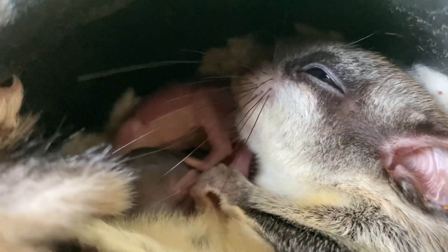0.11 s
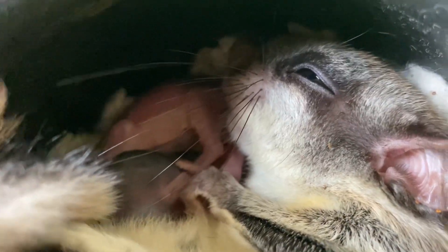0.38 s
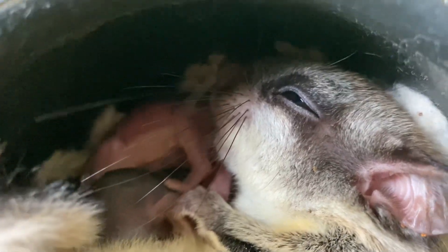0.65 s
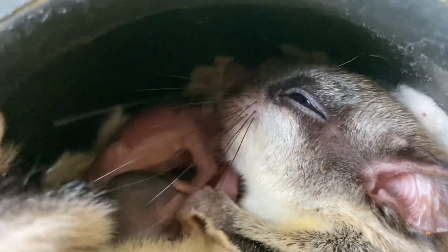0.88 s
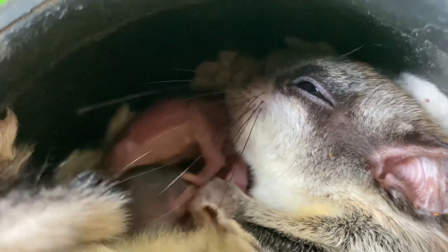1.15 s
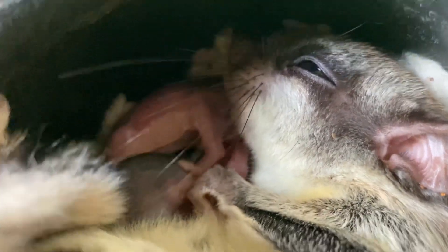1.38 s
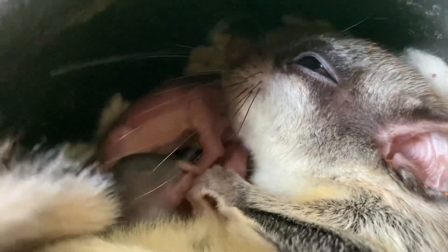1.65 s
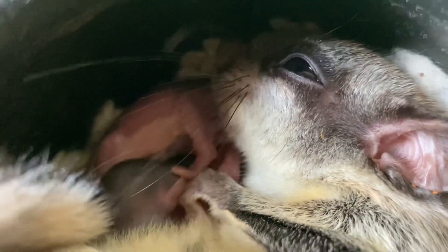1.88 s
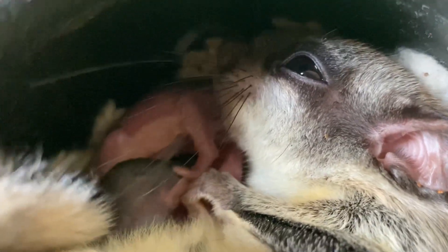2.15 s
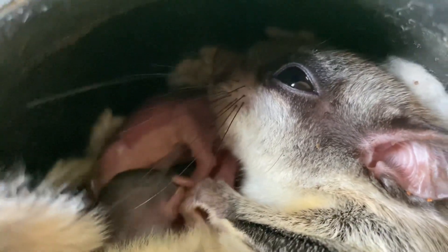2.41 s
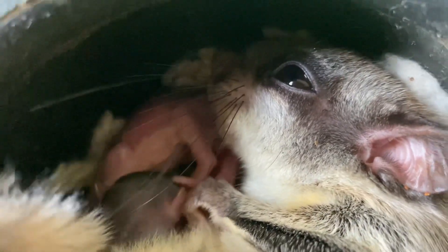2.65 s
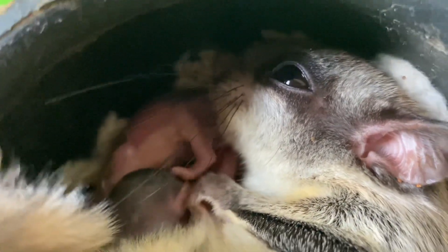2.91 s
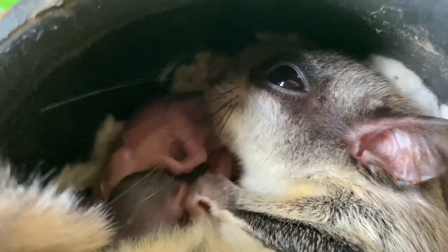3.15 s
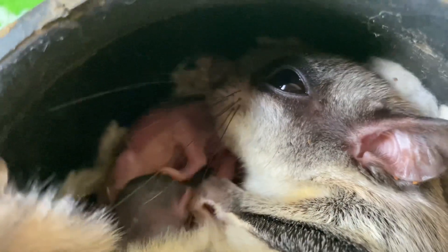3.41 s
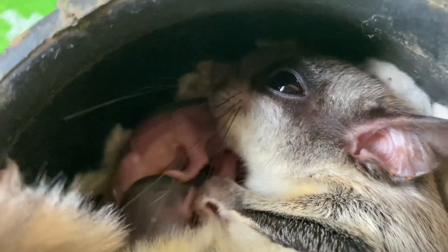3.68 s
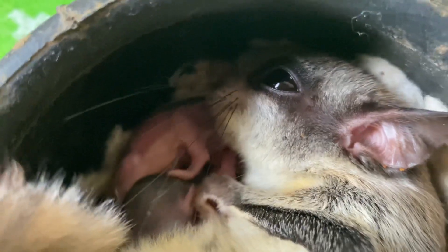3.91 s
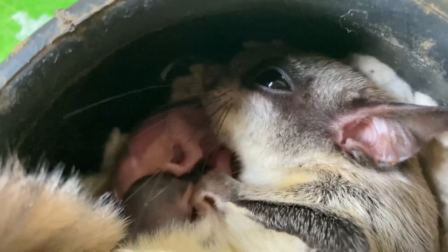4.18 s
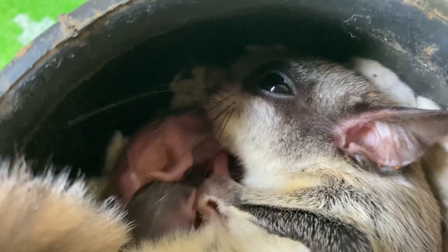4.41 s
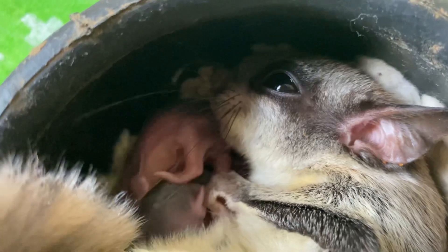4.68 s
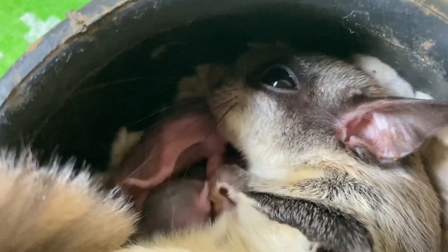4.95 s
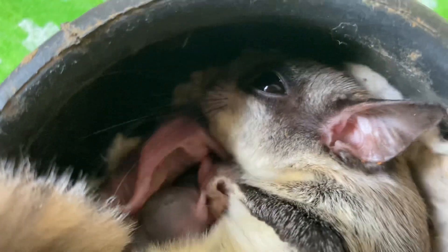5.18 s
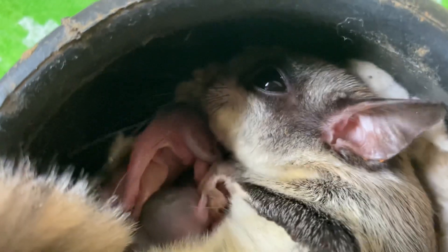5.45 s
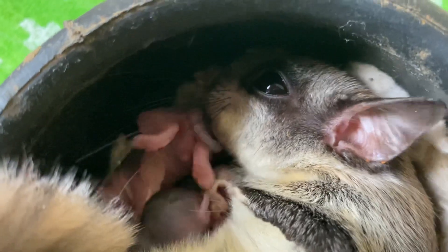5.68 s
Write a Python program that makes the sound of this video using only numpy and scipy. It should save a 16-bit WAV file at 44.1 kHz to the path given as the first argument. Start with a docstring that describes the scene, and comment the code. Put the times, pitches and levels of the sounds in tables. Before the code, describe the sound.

Low wavering engine hum, traffic rumble and light hiss run throughout. Over them, a very small animal pup calls in irregular clusters: brief bending squeaks, upward-leaping whistles, scratchy rasps and dry single clicks. The calls are strongest around three seconds, busy again after four, and sparse after five. The pup is near the microphone in a small hollow; the engine and traffic are far off.

```python
"""A newborn rodent squeaks, rasps and clicks in a hollow nest close to a pair of microphone ports. Its vocal
folds make trains of sharp pressure dips: regular in squeaks, uneven in rasps, single in clicks. The mouth and
the ports colour them, and a short noise tail is the faint ring of the nest. A distant engine drones as three
wavering tones. Behind it, shaped noise makes traffic rumble and hiss."""
import sys
import numpy as np
from scipy import signal
from scipy.fft import rfft, irfft, next_fast_len
from scipy.io import wavfile
from scipy.ndimage import uniform_filter1d

SR = 44100
rng = np.random.default_rng(int(sys.argv[2]) if len(sys.argv) > 2 else 0)


def invert_db(level):
    """Linear amplitude ratio for a level in decibels (20 dB per decade), elementwise."""
    return 10 ** (np.asarray(level, dtype=float) / 20)


def pcm_store(signal):
    """Save signal as 16-bit PCM."""
    levels = np.round(np.clip(np.atleast_2d(signal), -1, 1) * 32767)
    wavfile.write(sys.argv[1], SR, levels.astype(np.int16).T)


N = 256662  # length in samples

# Clear squeaks whose pitch bends smoothly. Each row: start in seconds, length in seconds,
# level in dB before the mouth, start, middle and end pitch in Hz, extra overtone slope in dB per octave;
# in some rows also: pitch drop at the very end (0-1), fade in dB, weakening of every other pulse (0-1).
BENDING_SQUEAKS = [(0.876, 0.05, -43.5, 1200, 1170, 980, -7, 0, 0), (0.936, 0.049, -45, 1080, 999, 900, -7),
                   (1.081, 0.0087, -45, 990, 1065, 1120, -6), (1.264, 0.043, -46.5, 1516, 1532, 1375, -2.5),
                   (1.355, 0.021, -46, 1494, 1570, 1620, -1), (1.7385, .007, -46, 1450, 1520, 1560, -1.5),
                   (2.407, 0.047, -43, 1940, 1885, 2130, -0.5),
                   (2.657, 0.027, -37, 1437, 1472, 1455, 0, .1),
                   (2.712, .023, -39, 1290, 1400, 1490, 0, 0, 0, .75),
                   (2.768, .014, -46, 2250, 2260, 2240, -2), (2.95, 0.029, -36, 1335, 1353, 1114, 2),
                   (3.2205, .011, -36, 1640, 1680, 1720, 3, 0, 0, .9),
                   (3.229, .016, -38, 1740, 1740, 1560, 3.5),
                   (3.243, .0065, -38, 1600, 1610, 1600, 3, 0, 0, .9),
                   (3.668, .037, -44.5, 1900, 1900, 2119, -0.5),
                   (3.866, 0.0072, -45, 2060, 2140, 2300, -0.5),
                   (3.945, 0.018, -45, 950, 956, 945, 4, 0, 0),
                   (4.028, .012, -48, 1850, 1850, 1800, -1, 0, -6),
                   (4.265, .027, -39, 1250, 1520, 1540, 1, .25),
                   (4.312, 0.032, -38, 1340, 1630, 1450, 1, .25),
                   (4.372, .019, -42, 1400, 1540, 1650, 0, 0, -1), (4.6, .014, -40.5, 810, 825, 790, 1.5),
                   (4.707, 0.022, -46.5, 2285, 2140, 2050, 0.5),
                   (4.92, 0.025, -47, 1900, 2050, 1900, -3, .2),
                   (4.982, .0115, -46, 1600, 1780, 1700, -3, .4)]
# Squeaks that leap up and hold a whistle. Each row: start in seconds, climb in seconds, hold in seconds,
# level in dB before the mouth, low, high and end pitch in Hz;
# in some rows also: pitch drop at the very end (0-1), fade in dB.
LEAPING_SQUEAKS = [(1.6045, 0.027, .011, -36, 1160, 1400, 1380, .15),
                   (1.7175, .008, .011, -40, 1130, 1360, 1430),
                   (1.977, 0.0077, 0.033, -40, 1150, 1517, 1680, .35),
                   (2.1205, .0105, .034, -41, 1280, 1570, 2120, 0, -10),
                   (2.354, .022, 0.021, -37.5, 1248, 1870, 2110),
                   (2.733, .0155, .021, -37, 1490, 2330, 2300, 0, -1),
                   (2.993, .016, 0.026, -37.5, 1300, 2096, 1910),
                   (3.283, 0.0075, .038, -42.5, 1400, 1990, 2290),
                   (4.636, .036, 0.0032, -41, 1175, 1480, 1590)]
# Stretches where the folds beat unevenly. Each row: start in seconds, end in seconds, pitch in Hz,
# level in dB before the mouth; in some rows also: roughness (0-1), weakening of every other pulse (0-1).
RASPS = [(0.921, 0.986, 1047, -49, .8), (1.587, 1.606, 1141, -39, .9), (2.347, 2.356, 1208, -37.5),
         (2.398, 2.414, 1897, -39.5), (2.648, 2.66, 1400, -39.5, .6, .7),
         (2.682, 2.697, 1400, -39.5, .8, .7), (2.699, 2.714, 1300, -40.5, .8, .7),
         (2.724, 2.736, 1450, -45), (2.934, 2.969, 1385, -43), (2.979, 2.994, 1200, -33.5),
         (3.218, 3.223, 853, -41), (3.249, 3.26, 1403, -45), (3.267, 3.284, 1360, -43),
         (3.918, 3.948, 1620, -41, .6, .75), (3.96, 4.009, 1600, -40, .55, .75),
         (4.009, 4.016, 1354, -43, .7), (4.017, 4.027, 1250, -43, .5), (4.212, 4.227, 1400, -39.5, .55, .6),
         (4.236, 4.256, 1313, -46.5), (4.256, 4.266, 1150, -42), (4.292, 4.314, 1386, -43),
         (4.388, 4.397, 1400, -45), (4.591, 4.604, 1506, -43.5), (4.614, 4.642, 1249, -40),
         (4.945, 4.956, 1620, -50, .5)]
# Single snaps of the folds. Each row: time in seconds, level in dB before the mouth, pitch in Hz.
CLICKS = [(1.01, -45, 980), (1.03, -43, 950), (1.053, -47, 1130), (1.643, -46, 1050), (1.65, -45, 1450),
          (1.688, -42, 950), (1.694, -44, 982), (1.698, -43, 1030), (1.703, -45, 950), (1.707, -41, 1160),
          (1.712, -41, 1390), (1.93, -49, 1140), (1.937, -43, 1090), (2.07, -41, 1170), (2.113, -42, 950),
          (2.116, -41, 1390), (2.319, -51, 1440), (3.055, -49, 1560), (3.074, -46, 1150),
          (3.077, -47, 1490), (3.261, -42, 1440), (3.529, -49, 1200), (3.534, -49, 1450),
          (3.546, -45, 1430), (3.556, -46, 1100), (3.564, -44, 1410), (3.57, -45, 1530), (3.577, -45, 1530),
          (3.605, -49, 1430), (3.635, -46, 1390), (3.666, -45, 1500), (3.897, -51, 1400),
          (3.906, -50, 1450), (3.914, -45, 1400), (3.917, -44, 1530), (4.205, -45, 1270),
          (4.208, -44, 1370), (4.227, -45, 1270), (4.231, -44, 1490), (4.346, -48, 1430),
          (5.049, -50, 1370), (5.072, -49, 1200), (5.076, -46, 1430), (5.08, -43, 1380), (5.094, -46, 977),
          (5.3, -49, 1320), (5.311, -46, 1370), (5.34, -45, 1090), (5.591, -49, 1080), (5.616, -44, 1110),
          (5.639, -44, 1140), (5.655, -46, 1450), (5.799, -48, 991), (1.579, -45, 1080),
          (1.7365, -43, 1100), (2.035, -46, 1250), (2.04, -46, 1150), (2.6265, -47, 1400),
          (3.212, -46, 1000), (3.492, -49, 2100), (3.5095, -50, 2000), (3.5935, -49, 1400),
          (3.597, -48, 1450), (4.9085, -49, 2100)]
# Colour given to all the calls by the small mouth and the ports, with a peak near 2.5 kHz. Each row: frequency
# in Hz, gain in dB.
CALL_COLOUR = [(600, -3), (1000, 3), (1900, 2.5), (2500, 3.5), (3100, 1), (4600, -2.5), (7000, -9), (10000, -17),
               (12000, -21), (14500, -22)]
# The nearby voice at the two ports. Each row: frequency in Hz, left over right in dB,
# lead of the left port in radians.
PORTS = [(90, 0, 0.26), (300, 30.5, 0.5), (810, 8.5, 1.7), (1200, 6.5, 2.1), (1532, 3, 2), (1900, 3.5, 4),
         (2590, -2.2, 7), (3300, 2, 7.5), (4300, 10.5, 7), (5330, 6.5, 4.5), (6720, -3.5, 6.5),
         (8900, 0, 3.1), (9860, -2.5, 1), (10700, 6, 0.6), (13000, 0, -3.1), (14400, 5, -6)]
# The engine and the traffic. Each row: time in seconds, firings a second, level of the third, fourth
# and fifth order in dB, relative lift of the traffic rumble in dB.
ENGINE = [(0, 18.8, -55, -41, -51, -1), (1.898, 21.5, -54.5, -46, -54.5, -1),
          (2.4, 20.5, -55.5, -48.5, -49.5, -1), (3.097, 25.8, -50.5, -50.5, -50, -1),
          (3.599, 23.2, -45, -45.5, -54, -2), (4.202, 23.3, -37.5, -52.5, -48.5, 1),
          (4.902, 24.4, -48.5, -37, -44, 1.5), (5.82, 21.2, -47, -48.5, -50, 2.5)]
# Steady surroundings. Each row: frequency in Hz, relative level per Hz in the left port in dB,
# unshared part in the right port in dB (0 or more means all of it), left over right in dB.
AIR = [(29.3, -97.5, -26, 0), (54.4, -60.5, -11.5, -0.5), (94, -60.5, -17, -0.5),
       (152.6, -65.5, -13.5, -1.5), (218.7, -77, -2, -1.5), (605, -90, -2.7, 2), (1500, -101, 4, -9.5),
       (1777, -98, 1.5, 0.5), (2550, -86, -2.6, -0.5), (3990, -97.5, -1.5, 1.5), (4210, -92, -0.8, 4),
       (5880, -99, 1, -0.5), (6250, -108, -3.5, 0), (7300, -106, -3, 2), (8900, -116, -21, 0),
       (10500, -126, -10, 0), (16000, -136, 13.5, -9)]

AIR_DB = -42.5  # overall level of the surroundings
WOBBLE = 0.011  # unsteadiness of a squeak's pitch, rms share
LEAP_SLOW_S = 0.012  # the climb gathers speed over about this long
RISE_DB, RISE_S = -2.5, 0.009  # soft start of a squeak and how fast it passes
FADE_DB, FALL_SHARE = -2.5, 0.74  # usual fade, over this last share of a squeak
SHARP_DB = -7.5  # overtone slope at 1500 Hz, dB per octave
HIGH_CALL_DB_PER_OCT, CLIMB_DB_PER_OCT = -1, -7.5  # its change with pitch: between calls, within a call
DROP_S = 0.0025  # the folds slacken this fast as a squeak stops
HALVING, ROUGH = 0.4, 0.9  # usual weakening of every other pulse in a rasp; usual roughness
SNAP_DELAY_S = 0.001  # added to the listed time of a click to place its dip


def read(points, hz):
    """Reads all columns of a table over frequency, on a logarithmic scale."""
    f, *columns = np.transpose(points)
    return [np.interp(np.log(hz + 1), np.log(f + 1), c) for c in columns]


def evened(x):
    """Scales to rms 1."""
    return x / np.sqrt(np.mean(x ** 2) + 1e-20)


def add(mix, s, sound):
    """Lays a sound into the mix at a time in seconds."""
    part = mix[round(s * SR):][:len(sound)]
    part += sound[:len(part)]


def folds(hz, slope_db, jitter, skip, weak, halving=0):
    """Sharp pressure dips; a cycle may be early, late or weak, and each lets out a puff of air."""
    luck = rng.random((len(hz) // 10 + 10, 3))  # one row of chance for each cycle
    cycle = (np.cumsum(hz) / SR).astype(int)
    uneven_hz = hz * (1 + jitter * (2 * luck[cycle, 0] - 1))
    turns = np.cumsum(uneven_hz) / SR + 0.5
    strength = np.where(luck[:, 1] < skip, weak, 1) * (1 - skip * luck[:, 2])
    strength[::2] *= 1 - halving
    strength = strength[(turns + 0.5).astype(int)]
    wave = np.full(len(hz), 0.6)  # mean flow: uneven pulses leave a low body under the pitch
    for k in range(2, 12):
        below_limit = k * hz < SR / 2
        wave += invert_db(slope_db * np.log2(k)) * below_limit * np.cos(2 * np.pi * k * turns)
    breath = uniform_filter1d(rng.standard_normal(len(hz)), size=2)
    puffs = breath * np.cos(np.pi * turns) ** 2
    wave += invert_db(slope_db - 14 + 18 * skip) * puffs
    # the fundamental rings on longer through a weak pulse than the overtones do
    core = np.cos(2 * np.pi * turns) * uniform_filter1d(strength, size=19)
    return -np.sqrt(2) * (core + wave * uniform_filter1d(strength, size=9))


def squeak(start, hz, level_db, drop, fade_db=FADE_DB, sharp_db=0, halving=0):
    """Nearly regular cycles: a clean gliding whistle, purer the higher it climbs."""
    t = np.arange(len(hz)) / SR
    wobble = evened(uniform_filter1d(rng.standard_normal(len(hz)), size=150))
    hz = hz * (1 + WOBBLE * wobble)
    hz = hz * (1 - drop * np.exp((t - t[-1]) / DROP_S))
    tail = np.clip((t / t[-1] - 1) / FALL_SHARE + 1, 0, 1)
    effort_db = RISE_DB * np.exp(-t / RISE_S) + fade_db * tail ** 2
    slope_db = SHARP_DB + sharp_db + HIGH_CALL_DB_PER_OCT * np.log2(hz.mean() / 1500)
    slope_db = slope_db + CLIMB_DB_PER_OCT * np.log2(hz / hz.mean())
    slope_db = slope_db + 0.45 * effort_db  # softer parts are also duller
    edge = np.clip(np.minimum(t, t[-1] - t) / 0.0014, 0, 1)
    wave = folds(hz, slope_db, jitter=0.03, skip=0.12, weak=0.6, halving=halving)
    return start, invert_db(level_db + effort_db) * edge * wave


def bend(start, length, level_db, start_hz, middle_hz, end_hz, sharp_db,
         drop=0, fade_db=FADE_DB, halving=0):
    """A squeak whose pitch follows a parabola through start, middle and end."""
    u = np.linspace(0, 1, round(length * SR))
    line = start_hz + (end_hz - start_hz) * u
    bow = (4 * middle_hz - 2 * start_hz - 2 * end_hz) * u * (1 - u)
    return squeak(start, line + bow, level_db, drop, fade_db, sharp_db, halving)


def leap(start, climb, hold, level_db, low_hz, high_hz, end_hz, drop=0, fade_db=FADE_DB):
    """A squeak whose pitch climbs ever faster, then drifts."""
    t = np.arange(-climb, hold, 1 / SR)
    floor = np.exp(-climb / LEAP_SLOW_S)
    up = (np.exp(np.minimum(t, 0) / LEAP_SLOW_S) - floor) / (1 - floor)
    drift = np.maximum(t, 0) / hold
    hz = low_hz + (high_hz - low_hz) * up + (end_hz - high_hz) * drift
    hz = uniform_filter1d(hz, size=150, mode="nearest")  # rounds the corner
    return squeak(start, hz, level_db, drop, fade_db)


def rasp(start, end, hz, level_db, rough=ROUGH, halving=HALVING):
    """Irregular cycles: strong and weak pulses at random."""
    n = round((end - start) * SR)
    wave = folds(np.full(n, float(hz)), slope_db=-6.5, jitter=0.27 * rough, skip=0.5 * rough,
                 weak=0.35, halving=halving)
    return start, invert_db(level_db) * evened(wave) * signal.windows.tukey(n, 0.3)


def click(s, level_db, hz):
    """One dip of the folds with a small swing before it and a short ring after."""
    t = np.arange(-round(2.5 * SR / hz), round(5 * SR / hz)) * hz / SR  # in cycles from the dip
    wave = folds(np.full(len(t), float(hz)), slope_db=-12.0, jitter=0, skip=0, weak=1)
    shape = np.where(t < 0, np.exp(-(t / 1.24) ** 2), np.exp(-t / 0.6))
    return s + SNAP_DELAY_S + t[0] / hz, invert_db(level_db) * evened(wave * shape)


def pup():
    """All calls through the small mouth, with the nest's faint ring, reach two ports unequally."""
    voice = np.zeros(N)
    for calls, make in ((BENDING_SQUEAKS, bend), (LEAPING_SQUEAKS, leap), (RASPS, rasp), (CLICKS, click)):
        for row in calls:
            add(voice, *make(*row))
    no_bass = signal.butter(2, 600, "high", fs=SR, output="sos")  # a tiny mouth sends out little bass
    voice = signal.sosfilt(no_bass, voice)
    size = next_fast_len(2 * N)
    hz = np.fft.rfftfreq(size, 1 / SR)
    colour_db = read(CALL_COLOUR, hz)[0]
    voice = irfft(rfft(voice, size) * invert_db(colour_db), size)[:N]
    t = np.arange(SR // 10) / SR
    # the ring starts after 1 ms and falls by 60 dB in 0.07 s
    nest = rng.standard_normal((2, len(t))) * invert_db(-60 * t / 0.07) * (t > 0.001)
    nest = nest / np.linalg.norm(nest[0])
    ring = invert_db(-21) * signal.oaconvolve(voice[None], nest, axes=1)[:, :N]
    balance_db, lead = read(PORTS, hz)
    right = irfft(rfft(voice, size) * invert_db(-balance_db) * np.exp(-1j * lead), size)[:N]
    return np.array([voice, right]) + ring


def engine():
    """Low firing orders, each wavering in strength and phase on the long way here."""
    s, rate, *orders_db, _ = np.transpose(ENGINE)
    t = np.arange(N) / SR
    turns = np.cumsum(np.interp(t, s, rate)) / SR
    drone = np.zeros(N)
    for order, db in enumerate(orders_db, 3):
        noises = rng.standard_normal((2, N))
        a, b = (evened(uniform_filter1d(uniform_filter1d(v, 5000), 5000)) for v in noises)
        tone = np.exp(2j * np.pi * (order * turns + rng.random()))
        wavering = (1 + 0.39 * (a + 1j * b)) * tone
        drone += invert_db(np.interp(t, s, db)) * evened(wavering.real)
    return drone


def air():
    """Random short-time spectra: traffic rumble below, a patchy hiss above, a slow swell."""
    frames, hz = N // 512 + 5, np.fft.rfftfreq(2048, 1 / SR)
    a, b, c, d, patches = rng.standard_normal((frames, 1025, 5)).T
    patches = evened(uniform_filter1d(uniform_filter1d(patches, 20, 0), 8, 1))
    t = np.arange(frames) * 512 / SR
    # slow waves from 0.15 to 3 a second, the slowest strongest
    waves = [np.sin(2 * np.pi * (f * t + rng.random())) / np.sqrt(f) for f in np.geomspace(0.15, 3, 20)]
    swell = evened(sum(waves))
    level_db, unshared_db, balance_db = (v[:, None] for v in read(AIR, hz))
    unshared = invert_db(np.minimum(unshared_db, 0))
    lead = read(PORTS, hz)[1][:, None]
    s, *_, rumble_db = np.transpose(ENGINE)
    lift_db = np.interp(t, s, rumble_db) / (1 + (hz[:, None] / 350) ** 2)  # mostly the low end
    lift_db -= 0.6 * t * np.exp(-np.log((hz[:, None] + 1) / 4000) ** 2)  # the hiss slowly recedes
    left = a + 1j * b
    shared = np.sqrt(1 - unshared ** 2) * left * np.exp(-1j * lead)
    right = (shared + unshared * (c + 1j * d)) * invert_db(-balance_db)
    spectra = np.array([left, right]) * invert_db(level_db + lift_db + 1.35 * patches + 0.097 * swell)
    noise = signal.istft(spectra, nperseg=2048, noverlap=1536)[1][:, :N]
    return invert_db(AIR_DB) * evened(noise)


def scene():
    """The pup over engine and air."""
    return pup() + engine() + air()


def band_limit(x):
    """A steep low-pass at the top of the band."""
    return signal.sosfilt(signal.butter(12, 16440, fs=SR, output="sos"), x)


def record(dry):
    """Turns the finished mix into the final sound."""
    return band_limit(dry)


dry = scene()
out = record(dry)
pcm_store(out)
```